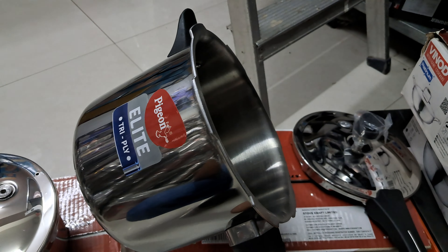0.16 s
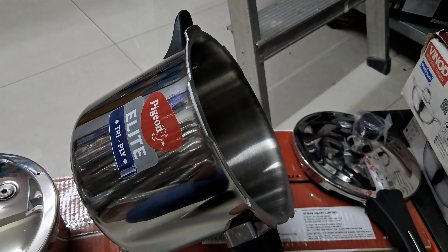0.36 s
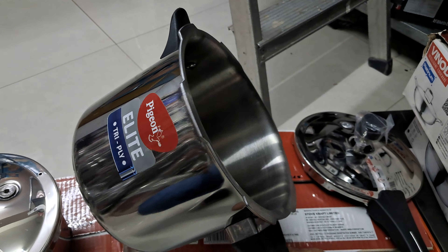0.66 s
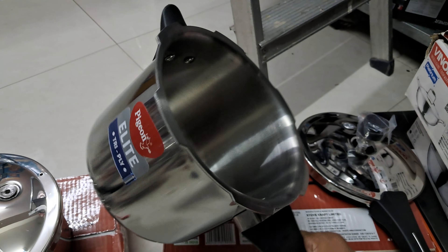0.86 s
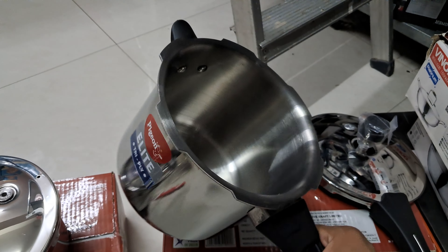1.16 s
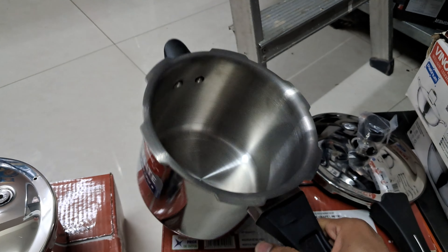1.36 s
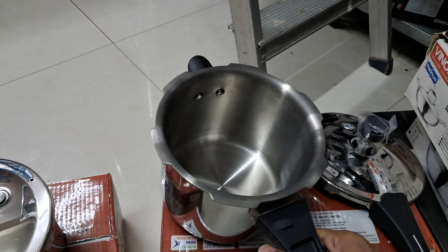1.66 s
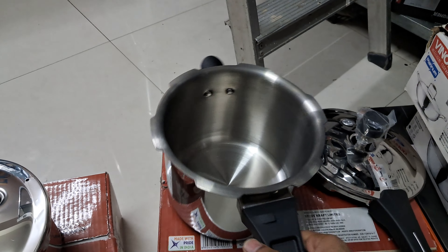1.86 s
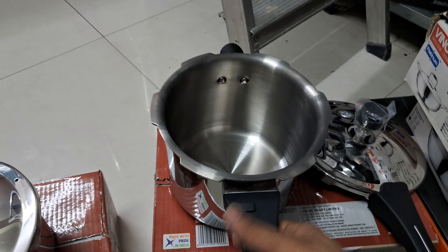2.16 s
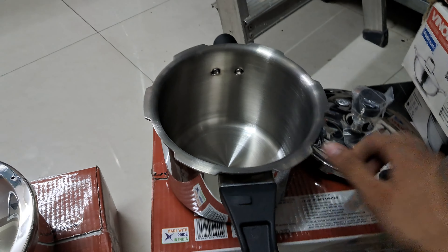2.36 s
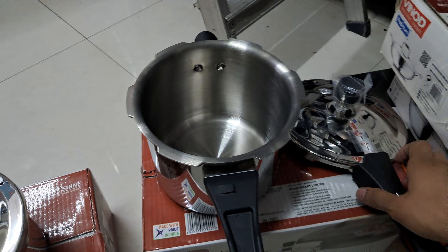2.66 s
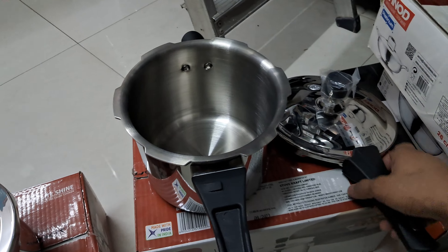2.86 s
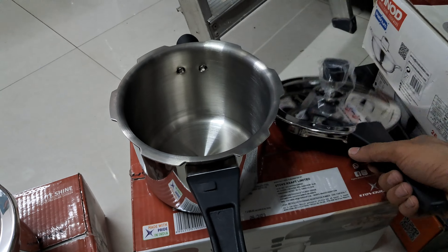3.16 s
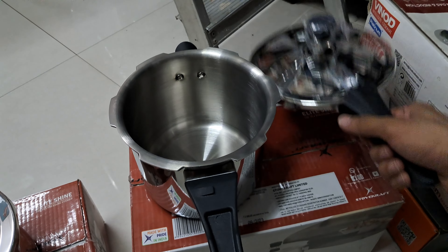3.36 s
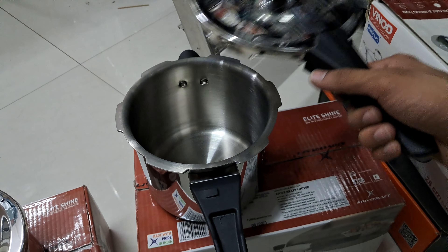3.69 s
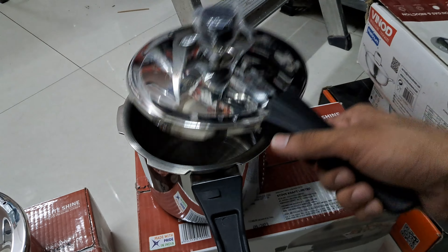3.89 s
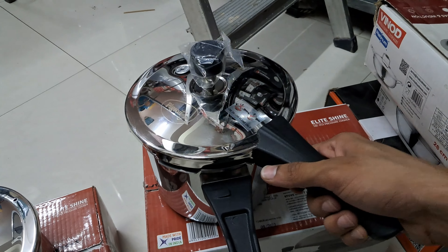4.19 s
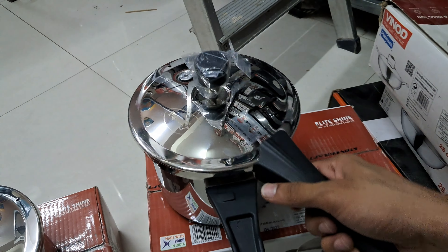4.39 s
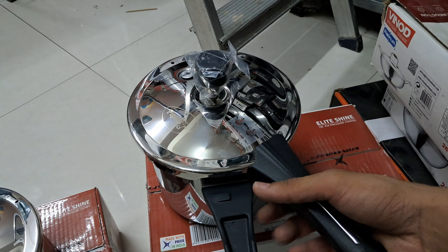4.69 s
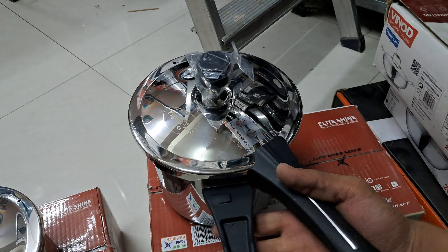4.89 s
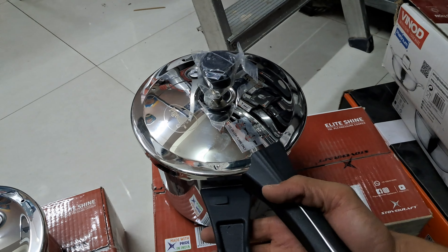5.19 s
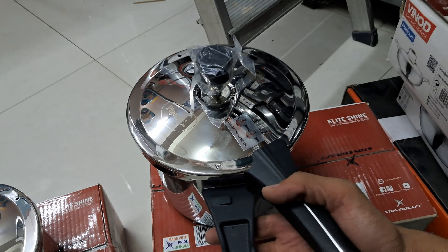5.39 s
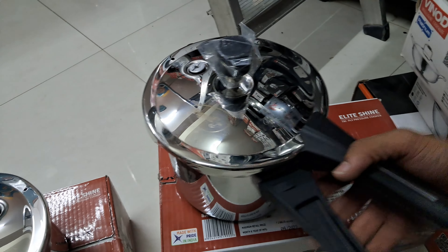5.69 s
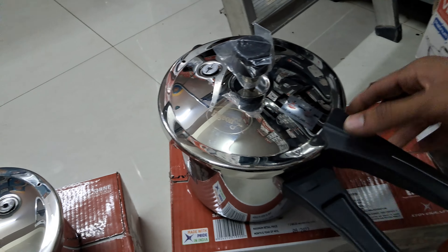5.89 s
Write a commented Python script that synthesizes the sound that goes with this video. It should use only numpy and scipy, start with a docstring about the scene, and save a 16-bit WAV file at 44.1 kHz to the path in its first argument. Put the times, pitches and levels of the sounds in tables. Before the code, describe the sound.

A steel pot is set down with dull bumps, its lid clangs, chatters onto the rim and clacks shut over steady shop rush.

```python
"""A steady shop rush runs throughout, with a soft recurring hoot, probably from a ceiling fan.
Hands rub and bump the hand-held camera: low noise and short thumps. Filtered noise makes rush and slides.
A steel pressure cooker is stood on a cardboard box, which gives a few low, damped cycles at each bump.
Its lid is picked up, knocks the rim, is seated and twisted shut: damped steel modes with noise bursts."""
import sys
import numpy as np
from scipy import signal
from scipy.fft import rfft, irfft, next_fast_len
from scipy.io import wavfile
from scipy.ndimage import uniform_filter1d, map_coordinates

SR = 44100
rng = np.random.default_rng(int(sys.argv[2]) if len(sys.argv) > 2 else 0)


def int16_out(signal):
    """Quantize to a 16-bit WAV file."""
    q = np.round(np.clip(np.atleast_2d(signal).T, -1, 1) * 32767)
    wavfile.write(sys.argv[1], SR, q.astype(np.int16))


N = 266364

# edges between the registers of steel's ring: [f/Hz]
REGISTER_EDGES_HZ = [1200, 2800, 6000, 12000]
# spectrum of a fine rustle or hiss: [f/Hz, relative density/dB per Hz]
RUSTLE_SPECTRUM = [(1470, -21), (2500, -10.5), (5650, -9), (6200, -9), (7300, -9.5), (8730, -3.5),
                   (11200, -9), (12500, -6), (16000, -20.5)]
# left-right correlation of nearby sources: [f/Hz, correlation/1]
NEAR_CORRELATION = [(300, 0.77), (1400, 0.53), (3000, 0), (10000, 0)]
# crowded short modes of a dry snap: [f/Hz, relative density/dB per Hz]
SNAP_SPECTRUM = [(150, -26), (400, 7.5), (750, -14), (1050, -4), (1300, -9), (2000, -2.5), (2900, -7),
                 (3400, -9.5), (6000, -16.5), (8500, -23.5), (11000, -21), (12500, -14), (15500, -17)]
TOP_HZ = 15950  # upper band limit
FIRST_HOOT_S, TURN_S = 0.1738, 0.20736  # first hoot and period of rotation


def amp(db):
    """Level to amplitude ratio: 20 dB is a factor of ten."""
    return 10 ** (np.asarray(db) / 20)


def unit(x):
    """Normalization by the root mean square, to rms 1."""
    return x / np.sqrt(np.mean(x ** 2) + 1e-20)


def along(points, hz):
    """Interpolation of (f/Hz, value) points on a logarithmic frequency axis."""
    f, v = np.transpose(points)
    return np.interp(np.log(hz + 1), np.log(f + 1), v)


def curve(rows):
    """Linear interpolation of (t/s, value) rows, one value per sample."""
    return np.interp(np.arange(N) / SR, *np.transpose(rows))


def wobble(rate):
    """Slow random modulation: a spline through rate random knots a second."""
    knots = rng.standard_normal(int(N * rate / SR) + 4)
    return map_coordinates(knots, [np.arange(N) * rate / SR])


def add(track, s, sound):
    """Superposition: a sound is summed into the track at s seconds."""
    start = max(round(s * SR), 0)
    track[:, start:start + sound.shape[1]] += sound[:, :N - start]


def panned(x, left_db):
    """Interaural level difference: the left port is left_db above the right."""
    return x * amp([[left_db / 2], [-left_db / 2]])


def noise(spectrum, alike, size=N):
    """Partly coherent noise: mid and side, mixed by frequency, set the correlation; rms is 1."""
    m = next_fast_len(size)
    hz = np.fft.rfftfreq(m, 1 / SR)
    angle = np.arccos(np.clip(along(alike, hz), -1, 1)) / 2
    white = rfft(rng.standard_normal((2, m)))
    coloured = white * amp(along(spectrum, hz)) * [np.cos(angle), np.sin(angle)]
    mid, side = irfft(coloured, m)[:, :size]
    return unit(np.array([mid + side, mid - side]))


def shop(waver_db=-0.08, patchy_db=2, hiss_db=-76, swish_db=5.0):
    """Diffuse noise: patches swell and fade across time and pitch; a hiss swishes at the fan's period."""
    # spectrum of the rush: [f/Hz, relative density/dB per Hz]
    air_spectrum = [(25, -17), (60, -1.5), (113, -18), (190, -11.5), (320, 0), (430, -10.5), (600, -6),
                    (780, -11.5), (930, -9), (1090, -19.5), (1280, -8), (1460, -19.5), (1900, -18),
                    (3800, -29.5), (6300, -40), (16000, -47.5)]
    # left-right correlation of the rush: [f/Hz, correlation/1]
    air_correlation = [(100, 0.52), (300, 0.74), (640, 0.81), (1400, 0.2), (3000, -0.17), (10000, 0.11)]
    # course of the rush before its slight wavering: [t/s, level/dB]
    rush_level = [(0, -48.5), (.35, -46.5), (.7, -49), (1.25, -47), (2.0, -46.5), (2.45, -48.5),
                  (2.9, -45.5), (4.0, -49), (4.35, -45.5), (4.75, -49), (5.25, -45.5), (6.04, -47.5)]

    z = signal.stft(noise(air_spectrum, air_correlation), nperseg=512)[2]
    field = uniform_filter1d(rng.standard_normal(z.shape[1:]), size=4, axis=0)  # smooth over frequency
    field = uniform_filter1d(field, size=9, axis=1)  # smooth over time
    air = signal.istft(z * amp(patchy_db * unit(field)), nperseg=512)[1][:, :N]

    swish = -np.sin(2 * np.pi * (np.arange(N) / SR - FIRST_HOOT_S) / TURN_S)
    hiss = amp(hiss_db + swish_db * swish) * noise(RUSTLE_SPECTRUM, air_correlation)
    return amp(curve(rush_level) + waver_db * wobble(6.3)) * unit(air) + hiss


def fan(hz=572, width=0.0098, waver=0.041, rough_db=2, scatter_db=1.4):
    """Periodic tone bursts: once a turn, a Gaussian envelope rounds a slightly rough sine."""
    # swell and fade before scatter and roughness: [t/s, peak level/dB, weakening of alternate turns/dB]
    hoot_level = [(.2, -32, 7.5), (.8, -34, 31), (1.25, -35.5, 7), (1.62, -37.5, 3), (2.05, -50, 0),
                  (2.5, -47.5, -4.5), (3.3, -33.5, -3.5), (3.75, -58.5, 0), (4.1, -46.5, -0.5),
                  (4.75, -36, -0.5), (5.4, -33.5, 3), (5.6, -38.5, 1.5), (5.8, -58, 0)]
    track, t = np.zeros((2, N)), np.arange(-SR // 20, SR // 20) / SR
    times, peak_db, limp_db = np.transpose(hoot_level)
    for turn, s in enumerate(np.arange(FIRST_HOOT_S, N / SR, TURN_S)):
        pull, size = rng.standard_normal(2)
        db = np.interp(s, times, peak_db - limp_db * (turn % 2 == 0)) + scatter_db * size
        tone = np.sin(2 * np.pi * hz * (1 + waver * pull) * t)
        add(track, s + t[0], amp(db) * np.exp(-(t / width) ** 2) * tone[None])
    return track * amp(rough_db * wobble(220))


def room(x):
    """Reverberation by convolution: shelves and tiled floor answer in frequency-dependent decay."""
    # reverberation time: [f/Hz, t60/s]
    reverberation = [(200, 0.4), (2000, 0.17), (12000, 0.21)]
    hz, t, z = signal.stft(rng.standard_normal((2, SR // 2)), SR, nperseg=256)
    decay = amp(-60 * t / along(reverberation, hz)[:, None])
    tail = signal.istft(z * decay, SR, nperseg=256)[1]
    tail = np.pad(tail, ((0, 0), (SR // 200, 0)))  # 5 ms before the first reflection
    return signal.fftconvolve(x, tail / np.linalg.norm(tail[0]), axes=1)[:, :N]


def grip(lumps_db=2.0, tremor_db=2.5):
    """Structure-borne noise: a trembling grip rumbles, little correlated between ports; nudges thump."""
    # restlessness of the grip before tremor: [t/s, rumble level/dB]
    grip_level = [(0, -39), (.4, -57.5), (.75, -38.5), (1.24, -37.5), (1.4, -45), (1.62, -34.5), (1.9, -40),
                  (2.08, -60), (2.22, -40.5), (2.48, -54.5), (2.7, -42), (2.92, -61), (3.06, -32),
                  (3.38, -63), (3.5, -38), (3.92, -54.5), (4.2, -37), (4.5, -55.5), (6.04, -50)]
    # shifts of the fingers: [t/s, level at the envelope's peak/dB]
    nudges = [(0.102, -34.5), (.2, -38.5), (0.311, -36), (0.519, -32.5), (0.708, -31.5), (.78, -34.5),
              (.91, -41.5), (1.042, -28), (1.24, -24.5), (1.459, -34), (1.641, -21), (2.38, -36.5),
              (4.74, -46), (4.84, -44), (5.076, -37.5), (5.55, -45), (5.939, -35)]
    # spectrum of the rumble: [f/Hz, relative density/dB per Hz]
    rumble_spectrum = [(15, -27), (38, -6.5), (70, 4.5), (95, 4.5), (135, 1), (190, -10.5), (300, -11),
                       (450, -25), (900, -59.5)]
    # spectrum of a thump: [f/Hz, relative density/dB per Hz]
    nudge_spectrum = [(20, -29), (50, -5), (90, 1.5), (135, 0), (230, -9), (400, -18), (900, -65)]
    nudge_s = 0.019  # time from the peak to 1/e of it

    t = np.arange(N) / SR
    lumps = amp(lumps_db * np.array([wobble(30), wobble(30)]))
    rumble = unit(lumps * noise(rumble_spectrum, [(60, 0.05), (300, 0.27)]))
    rumble = amp(curve(grip_level) + tremor_db * wobble(24)) * rumble
    push = sum(amp(db) * np.exp(-((t - s) / nudge_s) ** 2) for s, db in nudges)
    return rumble + push * noise(nudge_spectrum, [(60, 0.11), (300, 0.33)])


def box(t60=0.06, rise=0.0035, hollow_db=-7, level_db=3.0):
    """Damped oscillation: cardboard gives under each bump with a few low cycles and a hollow puff."""
    # dull bumps: [t/s, level before the common gain and rise/dB, f/Hz]
    bumps = [(1.026, -28.5, 231), (1.225, -27.5, 136), (1.246, -27.5, 143), (1.577, -18.5, 356),
             (1.622, -29, 207), (1.639, -28, 126), (2.168, -23.5, 108), (2.204, -27, 79), (3.06, -24, 118),
             (3.237, -22, 216)]
    puff_spectrum = [(50, -37), (190, -1), (400, -0.5), (700, -15.5),
                     (2000, -27.0), (6000, -48), (16000, -85)]  # f/Hz, relative density/dB per Hz
    track, t = np.zeros((2, N)), np.arange(SR // 4) / SR
    for s, db, hz in bumps:
        puff = noise(puff_spectrum, NEAR_CORRELATION, size=len(t))
        swell = (1 - np.exp(-t / rise)) * amp(-60 * t / t60)
        add(track, s, amp(db + level_db) * swell * (np.sin(2 * np.pi * hz * t) + amp(hollow_db) * puff))
    return track


def sliding(rustle_db=3.5, body_db=9, grain_db=1.5, stick_db=1.35):
    """Friction noise: each slide of pot, lid or hand swells, holds and dies, a grainy rustle over a body."""
    # slides: [t/s, duration/s, envelope peak before the layer gains/dB, time to swell/s]
    slides = [(1.536, .11, -61, 0.017), (1.62, 0.26, -68, .05), (1.794, 0.27, -57.5, 0.13),
              (2.235, 0.042, -67.5, 0.027), (2.36, 0.025, -60.5, 0.026), (2.523, .48, -67.5, 0.24),
              (2.69, .025, -62.5, .008), (2.782, 0.031, -60, 0.027), (2.998, .08, -60, .05),
              (4.61, 0.23, -70.5, .07), (4.86, 0.16, -64, 0.13), (5.3, 0.45, -59, 0.42),
              (5.797, 0.071, -65, .05)]
    # what a slide stirs in box and pot: [f/Hz, relative density/dB per Hz]
    body_spectrum = [(150, -25), (350, 7), (700, -2.5), (1300, -8.5), (2200, -9.5), (4000, -35)]
    start_db, fall_db_per_s = -22.5, 190  # onset relative to the peak; fall after the slide stops

    t, power = np.arange(N) / SR, np.zeros(N)
    for s, length, db, swell in slides:
        to_go = np.clip(1 - (t - s) / swell, 0, 1)
        fall_db = fall_db_per_s * np.maximum(t - s - length, 0)
        power += (t > s) * amp(db + start_db * to_go ** 2 - fall_db) ** 2

    texture = amp(grain_db * wobble(700) + stick_db * wobble(50))  # fine grain and slower sticking
    rustle = unit(texture * noise(RUSTLE_SPECTRUM, [(5000, 0.0095)]))
    body = noise(body_spectrum, NEAR_CORRELATION)
    return np.sqrt(power) * (amp(rustle_db) * rustle + amp(body_db) * body)


def registers(x):
    """Complementary band splitting: gong, ping, clink, sizzle and fizz sum to the whole ring."""
    below = []
    for hz in REGISTER_EDGES_HZ:
        lowpass = signal.butter(4, hz, fs=SR, output="sos")
        below.append(signal.sosfiltfilt(lowpass, x, padtype=None))
    return np.diff([0 * x, *below, x], axis=0)


def ring(modes, t, sustain, detune, scatter_db, apart_hz=2200):
    """Modal superposition: decaying sines, detuned by contact, out of phase at the ports when high."""
    hz, db, t60 = np.transpose(modes)[:, :, None]
    size, phase, skew, pull = rng.standard_normal((4, len(modes), 1))
    decay = amp(db + scatter_db * size - 60 * t / (t60 * sustain))
    lead = np.minimum(hz / apart_hz, 2) * (1 + skew) / 4  # radians
    angle = 2 * np.pi * (hz * (1 + detune * pull) * t + phase)
    return np.array([(decay * np.sin(angle + way * lead)).sum(0) for way in (1, -1)])


def crowded(spectrum, ripple_db, count=260):
    """Modal density: a thin shell's many modes ripple its spectrum with narrow peaks."""
    hz = np.linspace(100, TOP_HZ, count)
    depth_db = ripple_db * np.minimum(hz / REGISTER_EDGES_HZ[1], 1)
    return np.column_stack([hz, along(spectrum, hz) + depth_db * rng.standard_normal(count)])


def strikes(rows, modes, crowd, sustain, detune, rise, clash_db, clash_t60, crack_db, crack_t60,
            balance_db, size, scatter_db=1.35):
    """Impact excitation: crack, clash of crowded modes and ring, with brightness tilting the registers."""
    # level difference of gong, ping, clink, sizzle and fizz: [left above right/dB]
    left_excess = [0.81, 5.5, 1.9, 0.92, 0.505]
    track, t = np.zeros((2, N)), np.arange(size) / SR
    attack = SR // 100  # the first 10 ms set the level
    above_ping = np.arange(len(balance_db)) - 1  # registers counted from the ping
    for s, db, bright_db, clink_db in rows:
        burst = amp(clash_db - 60 * t / clash_t60) + amp(crack_db - 60 * t / crack_t60)
        blow = ring(modes, t, sustain, detune, scatter_db)
        blow = blow + burst * noise(crowd, NEAR_CORRELATION, size=size)
        blow = blow * (1 - np.exp(-t / rise))  # a glancing contact builds up slowly
        levels_db = db + np.array(balance_db) + bright_db * above_ping + clink_db * (above_ping == 1)
        for part, part_db, left_db in zip(registers(blow), levels_db, left_excess):
            add(track, s, amp(part_db) * panned(part, left_db) / part[:, :attack].std())
    return track


def moving():
    """Glancing contact: light touches wake small steel fittings while pot and lid are shifted."""
    # steel glances: [t/s, level before register balance/dB, brightness/dB per register, extra clink/dB]
    scuffs = [(1.6838, -65, 1.5, 11), (1.8357, -46, -1.5, -10), (1.8489, -51, 1, 2.5),
              (1.9125, -61.5, 4.0, 10.5), (1.9881, -59.5, 8, 1), (2.0725, -56.5, 1, -4),
              (2.2731, -72.5, 8.5, 0), (3.0692, -49, 0, -5), (3.1147, -59.5, 0, 10),
              (3.1652, -49.0, -2.5, -12), (3.242, -50, 4, -2.5), (3.2735, -49.5, -9, -4),
              (3.4041, -63.5, -5, 3)]
    # modes of small fittings, before scatter, detuning and sustain: [f/Hz, level/dB, t60/s]
    fitting_modes = [(1810, -5, 0.212), (1887, -0.5, 0.17), (1996, 1, .19), (3200, -9, 0.11),
                     (3287, 0.5, 0.16), (3000, -11, 0.045), (4024, -0.5, 0.064), (4270, -13, 0.12),
                     (4530, -7, 0.15), (5400, -14.5, 0.098)]
    # crowded modes of a light scuff: [f/Hz, relative density/dB per Hz]
    brush_spectrum = [(150, -30), (250, -12.5), (393, -8.5), (1120, -24), (1670, -7.5), (1950, -9),
                      (2490, -9), (3280, -4.5), (3650, -12), (4050, -5.5), (4820, -25), (5540, -16),
                      (6470, -30), (11900, -34), (16000, -39)]
    return strikes(scuffs, fitting_modes, crowded(brush_spectrum, ripple_db=3.0),
                   sustain=0.65, detune=0.01, rise=0.0018,
                   clash_db=-2, clash_t60=0.21, crack_db=-1, crack_t60=0.02,
                   balance_db=[3.0, -0.5, 3.5, -11, -21], size=SR // 5, scatter_db=4.0)


def locking():
    """Contact damping: hand and gasket hold the pressed lid, so its catching lugs give dry clacks."""
    # lug catches: [t/s, level before register balance/dB, brightness/dB per register, extra clink/dB]
    lug_clicks = [(4.532, -50, -0.5, -1), (4.6034, -49, -3, -4), (4.6259, -40.5, 1.5, -7),
                  (4.747, -53.5, 2.5, -2), (4.8998, -57, 3, 3.5), (4.9238, -51.5, -4, 0),
                  (5.056, -52.5, -10, 9), (5.0835, -33, -1.0, -2.5), (5.1133, -39.5, 3, 3),
                  (5.24, -42, 2.5, 4.5), (5.7685, -51, 0, 5.5)]
    # modes of the lid tight on its lugs, before scatter, detuning and sustain: [f/Hz, level/dB, t60/s]
    lug_modes = [(477, 11.5, 0.048), (1042, 15, 0.059), (1586, 11, 0.048), (2007, 20.5, 0.045),
                 (2340, 8.5, 0.064), (3440, 2, 0.079), (8350, 3.5, 0.09)]
    return strikes(lug_clicks, lug_modes, crowded(SNAP_SPECTRUM, ripple_db=4),
                   sustain=0.85, detune=0.0125, rise=0.00061,
                   clash_db=10, clash_t60=0.16, crack_db=16, crack_t60=0.04,
                   balance_db=[2.5, 0, -5.0, -11, -15], size=SR // 5)


def seating():
    """Coupled resonators: lid and pot ring together as the lid chatters into place on the rim."""
    # rim contacts: [t/s, level before register balance/dB, brightness/dB per register, extra clink/dB]
    rim_clanks = [(4.1395, -26.0, 1.0, -3), (4.1744, -43, -3.5, 7), (4.1984, -39.0, -1, -10),
                  (4.2083, -36, -2, -0.5), (4.2285, -43.0, 2.0, 1.5), (4.2956, -59.5, 5.5, 7),
                  (4.3126, -50.5, -7.5, 14), (4.33, -33, -2, 1), (4.368, -39, 2.5, -6.5),
                  (4.4096, -44.5, -5.5, 0.5)]
    # modes of pot and lid in contact, before scatter, detuning and sustain: [f/Hz, level/dB, t60/s]
    pot_modes = [(358, -5.5, 0.93), (545, -9, 0.2), (970, -6.5, 0.66), (1025, -9, 0.088), (1306, 8.5, 0.13),
                 (1350, -2, 0.33), (1802, 1, 0.28), (1912, 13, 0.13), (1950, 4, 0.12), (2150, -12, 0.088),
                 (2230, 3, 0.19), (2310, -1.5, .18), (2510, -1.5, 0.17), (2796, -2, 0.18),
                 (2740, -12, 0.19), (3220, -24, 0.21), (3300, -11.5, 0.38), (3390, -3, 0.18),
                 (3520, -5, 0.26), (3700, -13, 0.29), (4800, -7.5, 0.086), (5190, -6.5, 0.083),
                 (8000, -8, 0.19), (8450, -13, 0.19)]
    # crowded short modes at the rim: [f/Hz, relative density/dB per Hz]
    grind_spectrum = [(88, -42), (150, -14), (354, 1.5), (545, -10), (730, -20.5), (941, -17), (1080, -10),
                      (1310, -13), (1660, -28.5), (1980, 1.5), (2400, -21), (3550, -18), (4490, -28),
                      (13700, -21.5), (16000, -40)]
    return strikes(rim_clanks, pot_modes, crowded(grind_spectrum, ripple_db=0.0),
                   sustain=0.75, detune=0.0125, rise=0.00062,
                   clash_db=12.5, clash_t60=0.12, crack_db=-5.0, crack_t60=0.021,
                   balance_db=[-3.2, 1.5, 0.0, -9.5, -16.5], size=SR // 3, scatter_db=3.0)


def clang():
    """Free vibration: the hanging lid rings after its knock; its loose weight bounces ever more softly."""
    # knock on the pot: [t/s, level before register balance/dB, brightness/dB per register, extra clink/dB]
    lid_taps = [(3.482, -13.5, 0, 0)]
    # modes of the free lid, before scatter, detuning and sustain: [f/Hz, level/dB, t60/s]
    lid_modes = [(364.7, 13.5, 0.5), (401, 0, 0.94), (421, 5.5, 0.83), (460, 6, 0.17), (647, -4.5, 0.33),
                 (960, 13.5, 0.52), (1270, -7, 0.14), (1514, 7, 0.11), (1533, 13, 0.092),
                 (1790, -11.5, .14), (1928, 8, 0.12), (1970, 11, 0.11), (2034, 17.5, 0.13), (2216, 7, 0.12),
                 (2260, 6, 0.12), (2240, -6, .14), (2480, -13, .2), (3140, -3.5, 0.17), (3260, -8, .12),
                 (3400, -11.5, 0.11), (3631, -7.5, 0.29), (4000, -4.5, .12), (4660, -7.5, 0.087),
                 (4760, -7.5, .13), (8430, -3.5, 0.11), (8900, -15, .1)]
    # crowded short modes of the lid: [f/Hz, relative density/dB per Hz]
    clash_spectrum = [(100, -33), (250, -10.5), (390, 0.5), (500, -10), (650, -16), (800, -20), (1000, -14),
                      (1150, -14), (1500, 0), (1750, -14), (2030, -8.5), (2600, -13), (3900, -22),
                      (4800, -16.5), (6200, -37), (8400, -26.5), (14500, -33.5), (16000, -48.5)]
    bounce_at_s, flight_s = 3.6155, 0.117  # first bounce and time between bounces
    # first level before register balance; loss and dulling (per register) at each further bounce
    bounce_db, loss_db, dulling_db = -31.5, 13.5, 5.5

    knock = strikes(lid_taps, lid_modes, crowded(clash_spectrum, ripple_db=4.0),
                    sustain=0.99, detune=0, rise=0.0012,
                    clash_db=11, clash_t60=0.14, crack_db=22.5, crack_t60=0.02,
                    balance_db=[-5.5, 0, -6, -7.5, -17], size=SR * 3 // 4)
    rebounds = [(bounce_at_s + k * flight_s, bounce_db - k * loss_db, -k * dulling_db, 0) for k in range(3)]
    bounces = strikes(rebounds, lid_modes, crowded(SNAP_SPECTRUM, ripple_db=4),
                      sustain=0.61, detune=0.002, rise=0.0013,
                      clash_db=9, clash_t60=0.14, crack_db=8, crack_t60=0.03,
                      balance_db=[-26, -0.5, -7, -12.5, -13], size=SR // 4)
    return knock + bounces


def cooker():
    """Superposition of all the struck steel, from first touch to locked lid."""
    return moving() + clang() + seating() + locking()


def scene():
    """Direct and reverberant sound: cooker, box and fan excite the room; grip, slides and rush do not."""
    sources = cooker() + box() + fan()
    return sources + amp(-12.5) * room(sources) + grip() + sliding() + shop()


def record(dry):
    """Saturation and band limiting: the camera rounds loud peaks and drops all from TOP_HZ up."""
    ceiling = 0.8
    held = dry / (1 + (dry / ceiling) ** 4) ** (1 / 4)
    m = next_fast_len(N + SR // 2)
    passed = np.fft.rfftfreq(m, 1 / SR) < TOP_HZ
    return irfft(rfft(held, m) * passed, m)[:, :N]


dry = scene()
out = record(dry)
int16_out(out)
```